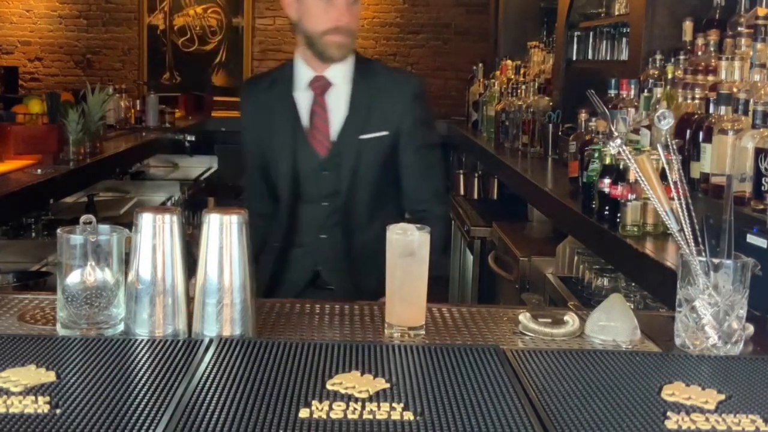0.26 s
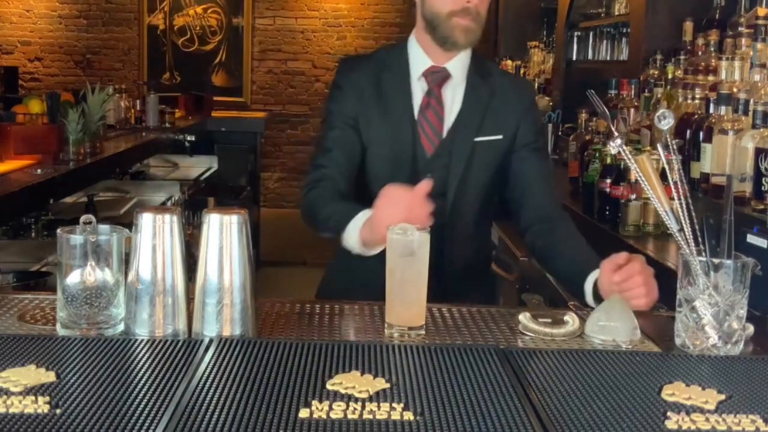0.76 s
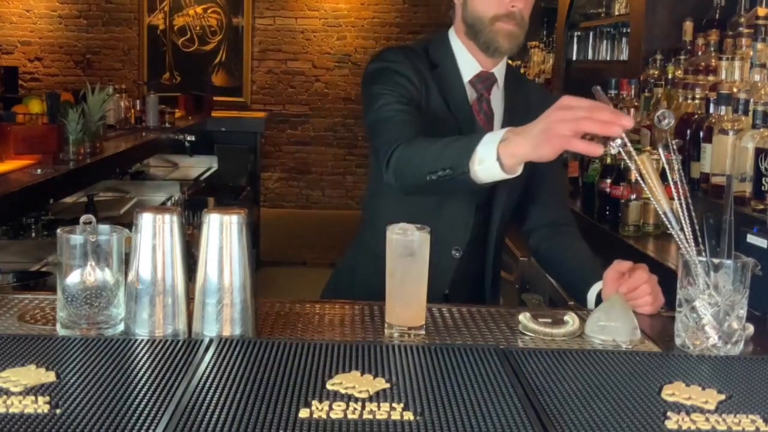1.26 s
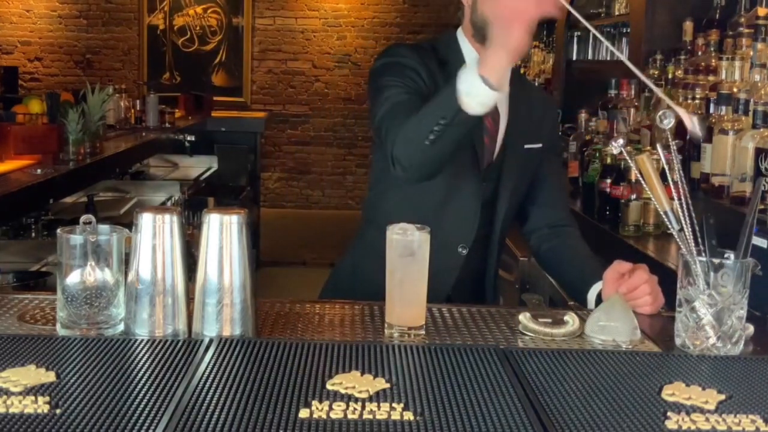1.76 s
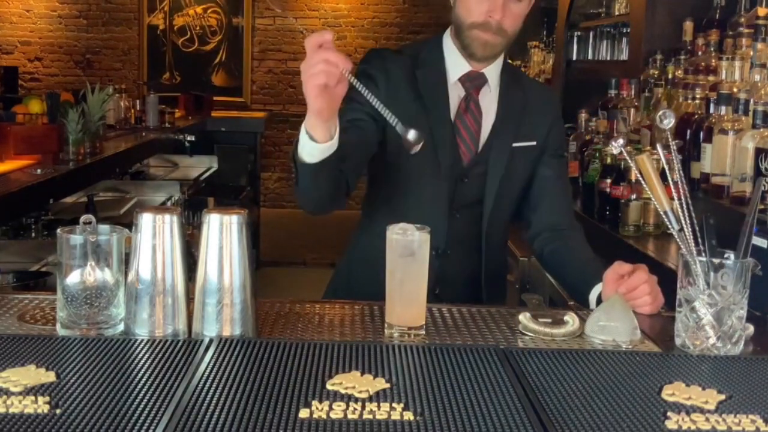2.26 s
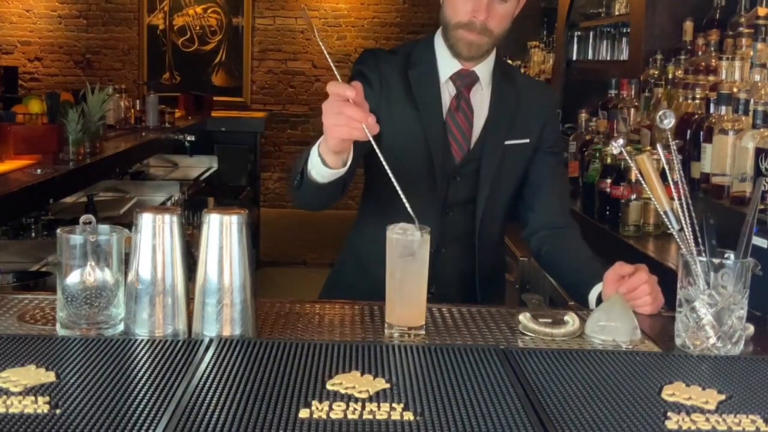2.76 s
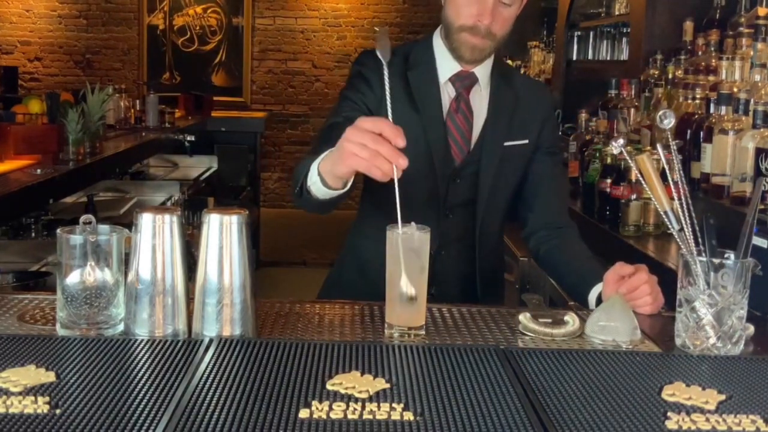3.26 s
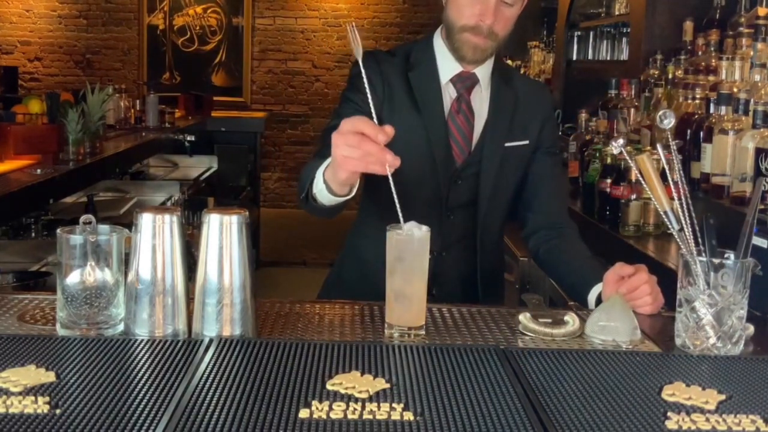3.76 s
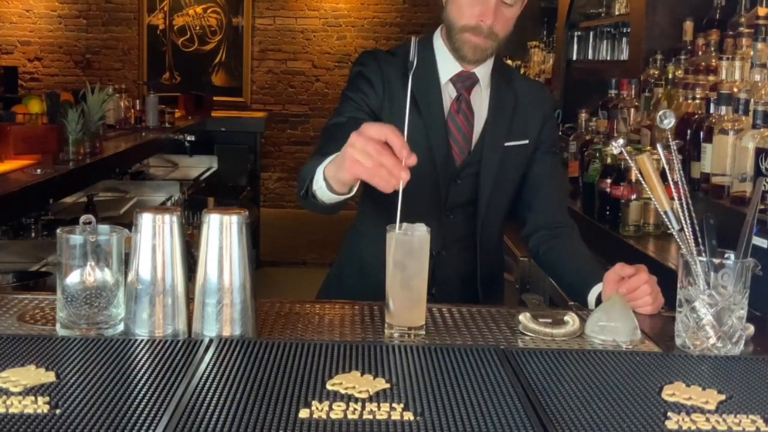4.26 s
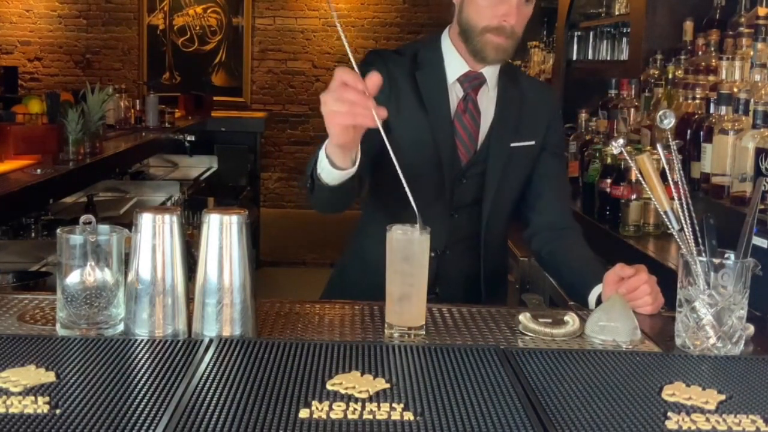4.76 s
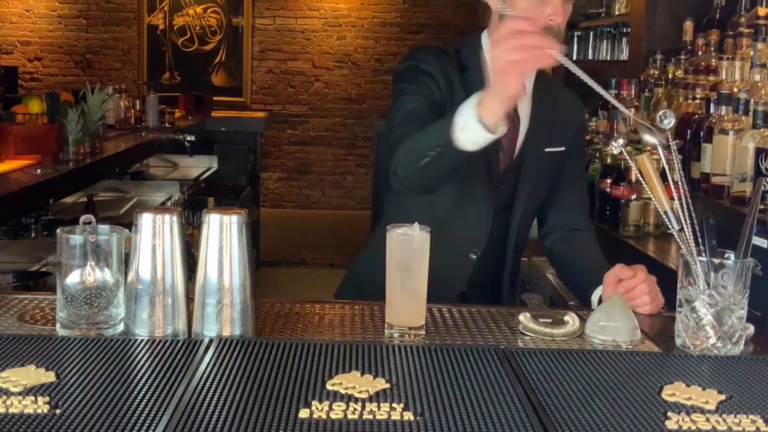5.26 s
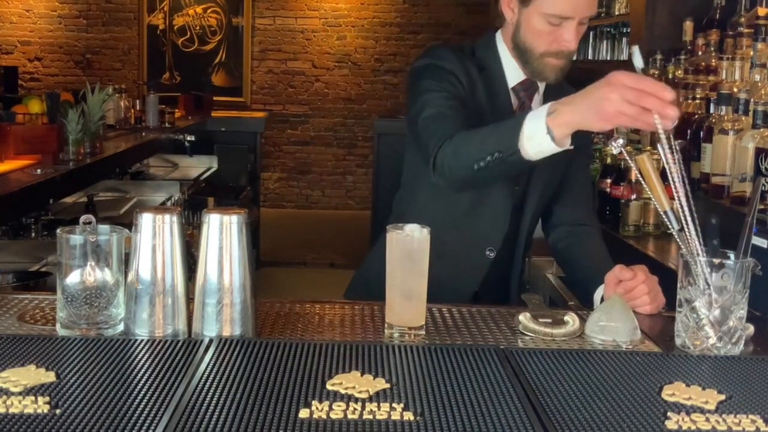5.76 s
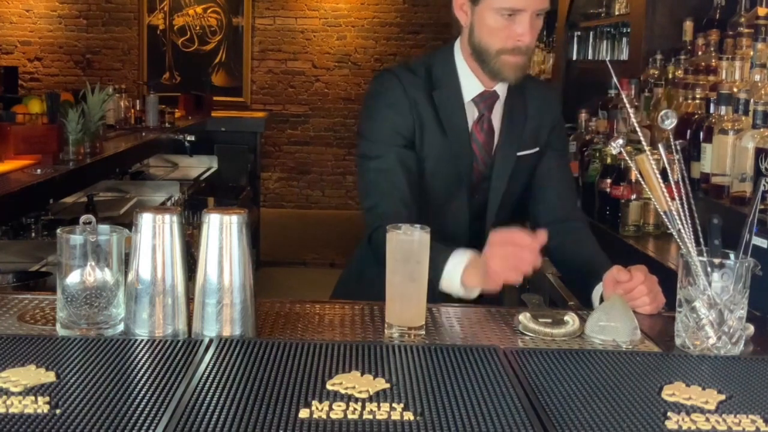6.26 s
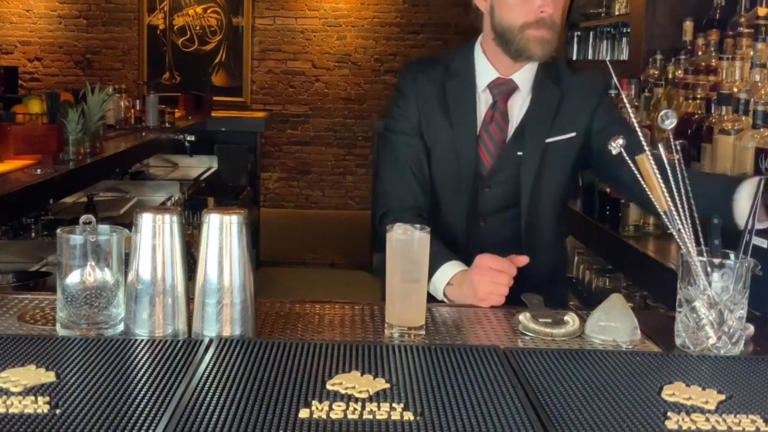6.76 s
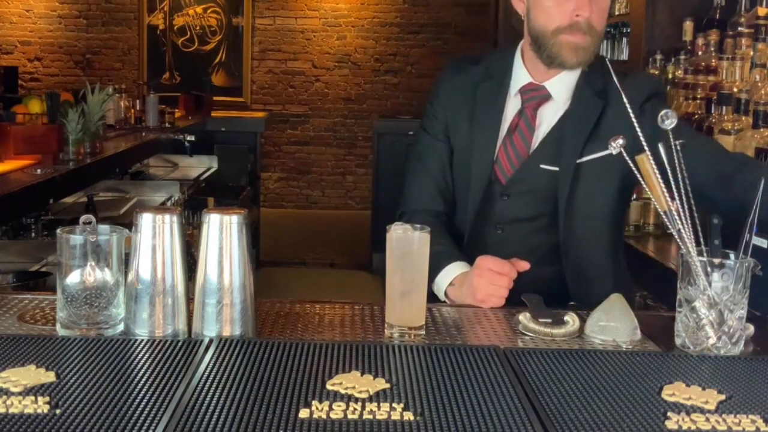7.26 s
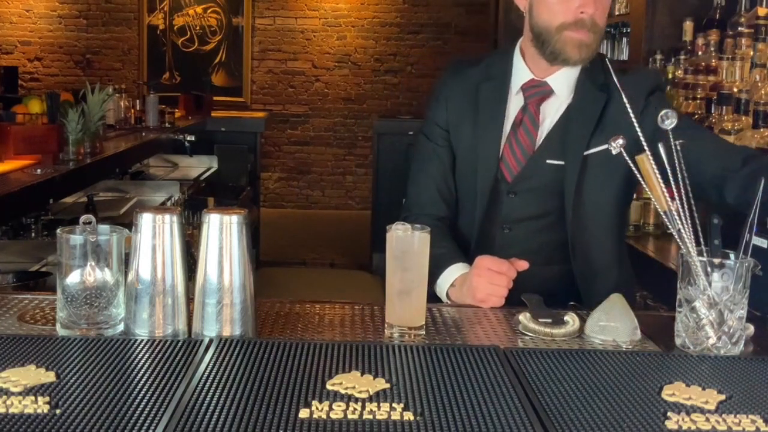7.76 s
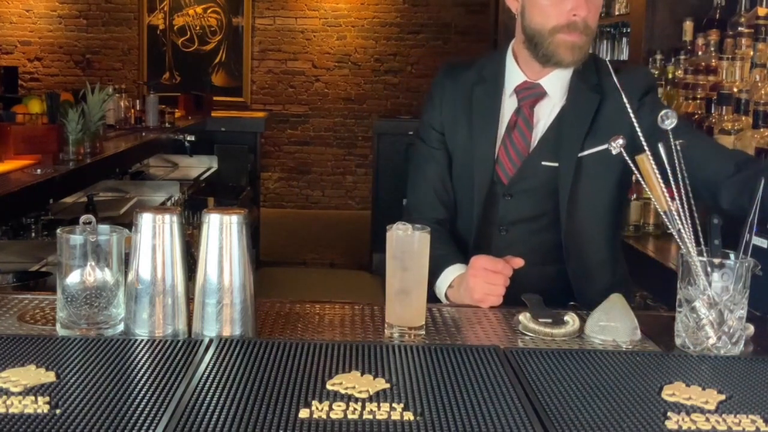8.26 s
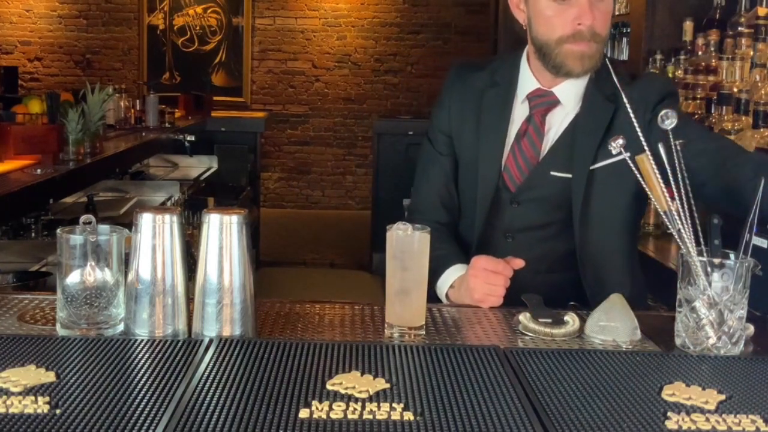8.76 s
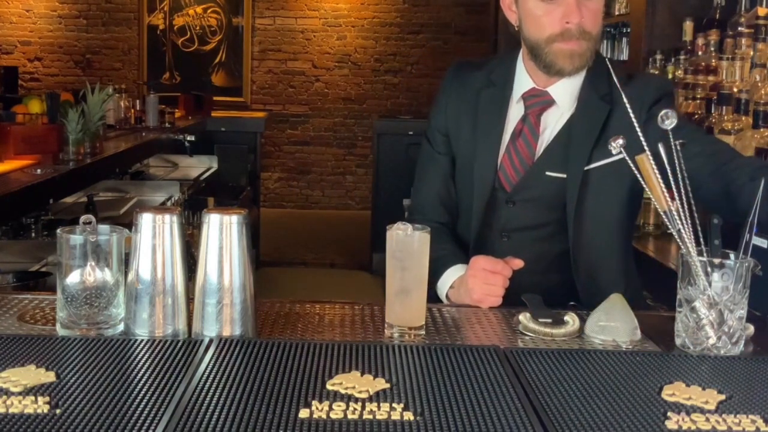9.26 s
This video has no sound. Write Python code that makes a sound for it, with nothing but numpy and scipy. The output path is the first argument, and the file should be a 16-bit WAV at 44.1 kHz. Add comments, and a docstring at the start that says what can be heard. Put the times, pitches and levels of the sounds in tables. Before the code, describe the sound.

A quiet bar with a low wavering engine hum and faint fridge drone. A metal spoon is drawn rattling from among others, taps a tall glass and stirs ice with small dry clicks and fine grinding. It is dropped back with a loud, bright jangle. After soft rubbing, thick bottles knock hard and ring in a steel rack. Close stereo microphones catch a lightly reverberant room.

```python
"""Quiet bar: an engine idles outside, a fridge hums, things shuffle, a sleeve rubs, dull knocks sound.
A bar spoon is drawn from a glass of spoons, stirs ice in a tall drink and is dropped back with a jangle.
Then bottles knock and ring in a steel rack, and a second engine pulls away.
Hits are coloured noise plus decaying modes, movements are swelling noise, engines are wavering sines.
All is heard through a closely spaced pair of microphone ports."""
import sys
import numpy as np
from scipy import signal
from scipy.fft import rfft, irfft, next_fast_len
from scipy.io import wavfile

SR = 44100
rng = np.random.default_rng(int(sys.argv[2]) if len(sys.argv) > 2 else 0)


def bounce(signal):
    """Save signal as a 16-bit WAV file at the path given by the first command-line argument."""
    frames = np.transpose(np.atleast_2d(signal))
    limited = np.clip(frames, -1, 1)
    pcm = np.round(limited * 32767).astype(np.int16)
    wavfile.write(sys.argv[1], SR, pcm)


N = 419832
TIME = np.arange(N) / SR

# likeness of the two ports: f/Hz, left-right correlation
PORT_CORRELATION = [(100,.98),(300,.85),(700,.4),(1300,.75),(2200,.7),(4000,.96),(6500,.84),(8300,.82),(9100,.998),(10400,.998),(11300,.78),(12900,.78),(13700,.995)]


def from_db(db):
    """Decibels to amplitude gain."""
    return 10 ** (np.asarray(db) / 20)


def rms_one(x):
    """Scale to rms 1."""
    return x / np.sqrt(np.mean(x ** 2) + 1e-20)


def in_time(rows):
    """Columns of a time curve, interpolated at each sample."""
    t_s, *columns = np.transpose(rows)
    return [np.interp(TIME, t_s, column) for column in columns]


def at_hz(points, hz):
    """Read a table on a log-frequency axis."""
    f_hz, value = np.transpose(points)
    return np.interp(np.log(hz + 1e-6), np.log(f_hz), value)


def dying(size, t60_s):
    """Exponential decay, -60 dB after t60_s."""
    return np.exp(-np.log(1000) * TIME[:size] / max(t60_s, 1e-3))


def add(out, t_s, sound):
    """Mix a sound in at a time."""
    at = int(t_s * SR)
    out[:, at:at + sound.shape[1]] += sound[:, :N - at]


def drift(rate_hz, size=N):
    """Random values joined by lines, spread about 1."""
    steps = TIME[:size] * rate_hz
    count = int(steps[-1]) + 2
    return np.interp(steps, np.arange(count), rng.standard_normal(count)) * np.sqrt(3 / 2)


def noise(colour_db, size=N):
    """Stereo noise shaped by colour_db(hz); mid and side are mixed to the ports' correlation."""
    padded = next_fast_len(size, True)
    hz = np.fft.rfftfreq(padded, 1 / SR)
    mid, side = rfft(rng.standard_normal((2, padded)))
    alike = np.clip(at_hz(PORT_CORRELATION, hz), 0, 1)
    pair = np.sqrt((1 + alike) / 2) * mid + np.sqrt((1 - alike) / 2) * side * [[1], [-1]]
    return irfft(pair * from_db(colour_db(hz)), padded)[:, :size]


def wash(spectrum):
    """Lasting noise of a given spectrum, rms 1."""
    return rms_one(noise(lambda hz: at_hz(spectrum, hz)))


def bump(hz, centre_hz, share):
    """Resonance of height 1; half-width is a share of its pitch."""
    return 1 / (1 + ((hz - centre_hz) / (share * centre_hz)) ** 2)


def resonant(colour, modes, hz, lift_db, share):
    """Broad colour in dB with a peak at each mode, lower for weak modes."""
    peaks = [bump(hz, mode[0], share) * from_db(min(mode[1], 0) / 4) for mode in modes]
    return at_hz(colour, hz) + lift_db * np.max(peaks, axis=0)


def contact(colour_db, body_db, middle_db, treble_db, t60_s, crack_db, grain_db, size=8192):
    """Hard touch: coloured noise with a brief crack and a tail kept uneven by chatter."""
    tilt = [(1700, body_db), (3200, middle_db), (7500, middle_db), (11500, treble_db)]
    tail = dying(size, t60_s) * from_db(grain_db * drift(500, size=size))
    crack = from_db(crack_db) * dying(size, 0.0022)
    return noise(lambda hz: colour_db(hz) + at_hz(tilt, hz), size=size) * (tail + crack)


def ring(modes, spread_db, flutter, size=44100):
    """One blow: modes of random strength decay and flutter as the loose object rocks."""
    out = np.zeros((2, size))
    for hz, level_db, t60_s in modes:
        apart = np.sqrt(1 - at_hz(PORT_CORRELATION, hz)) / 2
        phase = rng.uniform(0, 2 * np.pi) + apart * rng.standard_normal((2, 1))
        phase = phase + flutter * drift(45, size=size)
        strength = from_db(level_db + spread_db * rng.standard_normal())
        strength = strength * np.exp(flutter / 2 * drift(45, size=size))
        out += strength * dying(size, t60_s) * np.sin(2 * np.pi * hz * TIME[:size] + phase)
    return out


def gestures(rows, rise_s, fall_s):
    """Gain of movements: each swells, holds and dies away exponentially; powers add."""
    power = 0
    for t_s, hold_s, db in rows:
        fade = np.maximum(t_s - TIME, 0) / rise_s + np.maximum(TIME - t_s - hold_s, 0) / fall_s
        power = power + (from_db(db) * np.exp(-np.minimum(fade, 20))) ** 2
    return np.sqrt(power)


def orders(pitch_hz, table, waver_db, wander=.007):
    """Sines at multiples of a wandering pitch, each wavering in level."""
    turn = 2 * np.pi * np.cumsum(pitch_hz * (1 + wander * drift(13))) / SR
    return sum(np.sqrt(2) * from_db(db + waver_db * drift(9)) * np.sin(k * turn) for k, db in table)


def idle_engine():
    """Idling engine through the wall: a tone near the firing rate, with overtones of their own level."""
    # firing rate: t/s, f/Hz
    idle_pitch = [(0.0, 64.0), (0.1, 65), (1.18, 65), (1.54, 77.5), (2.6, 79.5), (2.77, 56), (2.99, 56),
                  (4.16, 62.5), (4.46, 63.0), (4.88, 57.5), (5.02, 78.0), (5.12, 75.5), (5.39, 61),
                  (6.67, 61), (6.91, 58.5), (8.09, 58.5), (8.8, 65.0)]
    # firing tone: t/s, level/dB
    idle_level = [(0.0, -45.5), (0.82, -45), (0.98, -61), (1.14, -48), (2.25, -46.5), (2.33, -54),
                  (2.94, -50.5), (3.71, -37.5), (3.95, -46), (4.48, -39.5), (4.58, -47.5), (5.19, -45),
                  (5.41, -52), (5.49, -43.5), (6.34, -32), (7.13, -41.5), (7.21, -31), (7.85, -31.5),
                  (8.3, -48.5), (8.59, -41.5), (9.47, -47.5), (9.52, -52.5)]
    # all overtones: t/s, level/dB
    idle_overtones = [(0.0, -65), (0.21, -59), (0.48, -73), (5.12, -62.5), (5.62, -54.5), (6.26, -58),
                      (6.81, -43), (7.37, -50.5), (7.64, -43), (9.23, -61.5), (9.52, -55)]
    # overtones: multiple of firing rate, level/dB re the overtone level
    idle_orders = [(2,-0.5),(3,-11.5),(4,-6.5),(5,-17)]
    (firing_hz,), (firing_db,) = in_time(idle_pitch), in_time(idle_level)
    (overtones_db,) = in_time(idle_overtones)
    firing = from_db(firing_db) * orders(firing_hz, [(0.99, 0)], waver_db=1.5)
    return firing + from_db(overtones_db) * orders(firing_hz, idle_orders, waver_db=1.0)


def fridge():
    """Fridge hum: two sines wavering in pitch and level."""
    # tones: f/Hz, level/dB
    fridge_tones = [(199,-64.5),(375,-61)]
    return orders(np.ones(N), fridge_tones, waver_db=2.5)  # multiples of 1 Hz


def room_tone():
    """Room air: broad noise with a slight level drift."""
    # spectrum, shape only: f/Hz, density/dB per Hz
    air_spectrum = [(20,-28),(35,-9),(50,-2),(70,3),(110,-7),(200,-8.5),(350,-12.5),(500,-18.5),(1000,-27),(2000,-33),(4000,-45.5),(8000,-54.5),(16000,-56.5)]
    return from_db(-48.5 + 0.27 * drift(4)) * wash(air_spectrum)


def shuffling():
    """Movements behind the bar: dull noise in swells."""
    # movements: hold start t/s, hold/s, level/dB
    shuffles = [(.11,0.037,-52),(.87,0.045,-56.5),(1.18,0.042,-45),(1.44,0.15,-51.5),(2.51,0.044,-49),(3.26,0.057,-49.5),(4.75,0.034,-46.5),(5.31,0.13,-57.5),(5.95,0.16,-48),(6.8,0.018,-49.5),(7.36,0.047,-61),(9.19,0.0093,-71)]
    # spectrum: f/Hz, relative level/dB
    shuffle_colour = [(100,-14),(400,4.5),(900,3),(1500,-2),(2500,-6),(5000,-18),(8000,-20.5),(12000,-33),(16000,-42)]
    gain = gestures(shuffles, rise_s=.035, fall_s=.1)
    return gain * from_db(1.5 * drift(70)) * wash(shuffle_colour)


def sleeve():
    """Sleeve rubbing while an arm reaches: uneven noise in swells."""
    # reaches: hold start t/s, hold/s, level/dB
    reaches = [(.53,0.48,-67.5),(5.47,.1,-75),(6.22,0.26,-67),(6.55,0.7,-66),(6.69,.01,-55.5)]
    # spectrum: f/Hz, relative level/dB
    sleeve_colour = [(300,-11),(2000,0),(5000,-2),(8000,2),(11000,2),(14000,-8),(16000,-8.5)]
    gain = gestures(reaches, rise_s=0.062, fall_s=0.082)
    return gain * from_db(1.5 * drift(76)) * wash(sleeve_colour)


def soft_knocks():
    """Soft knocks and plops: noise in one broad resonance, quick onset, short decay."""
    # knocks: t/s, level/dB, f/Hz
    knock_rows = [(1.108,-35,549),(1.169,-42,482),(3.229,-43.5,617),(3.871,-40.5,511),(4.682,-30.5,470),(4.745,-36,1150),(5.314,-39.5,420),(6.677,-42,441),(7.384,-43,600),(9.173,-46.5,1087),(9.197,-52,1640)]
    out = np.zeros((2, N))
    envelope = (1 - np.exp(-TIME[:8192] / 0.0025)) * dying(8192, t60_s=.1)
    for t_s, db, pitch_hz in knock_rows:
        thud = noise(lambda hz: 18 * np.log10(bump(hz, pitch_hz, 0.42)), size=8192)
        add(out, t_s, from_db(db) * rms_one(thud) * envelope)
    return out


def spoons():
    """Steel bowls jangle in their glass, long shafts sing on more softly; a landing knocks the glass."""
    # clashes: t/s, level/dB, body tilt/dB, treble tilt/dB
    spoon_hits = [(1.182,-41,-3,-27),(1.2,-31.5,-1.5,-23),(1.2366,-32.5,-12,-30),(1.394,-30,-10,-17),(1.418,-29,-5,-10),(1.439,-21,-13.5,-13),(1.5646,-22.5,-11,-11.5),(5.5212,-9.5,-21.5,-15),(5.5708,-10,-21,-16),(5.611,-12.5,-14,-23),(5.6197,-14.5,-11,-27),(5.65,-18.5,-16,-11),(5.9072,-22.5,-8,-15.5),(5.9354,-20.5,-15,-13.5),(5.995,-24,-9,-30),(6.0475,-30,-17,-28)]
    # shafts set swinging: t/s, level/dB
    shaft_hits = [(1.195,-51),(1.2376,-50.5),(1.4404,-57),(5.6184,-57),(5.9938,-47),(6.0475,-50.5)]
    # bowl modes: f/Hz, level/dB, t60/s
    spoon_modes = [(3750,-16,0.18),(4900,-9,.1),(5590,-3,0.15),(5720,-9,0.16),(5810,-7,0.22),(6500,-18,0.19),(8710,-8,0.17),(11120,-2,0.26),(12700,-5,0.13),(13506,-5,0.16),(14630,-7.5,.1)]
    # shaft modes: f/Hz, level/dB, t60/s
    shaft_modes = [(1405,1,0.6),(2100,-1,.33),(2535,5,.45),(2680,3,0.7),(3595,-4,0.4),(4230,-10,0.35),(4610,-10,0.55),(5790,-7.5,.4),(6508,-11.5,.5),(7390,-13,.45)]
    # glass holding the spoons: f/Hz, level/dB, t60/s
    holder_modes = [(2130,3,0.039),(2280,1,.08)]
    # contact colour: f/Hz, relative level/dB
    spoon_colour = [(100,-27),(350,1.5),(1000,5.5),(1600,-4),(3200,-2),(4500,-4),(5700,5),(7500,-0.5),(10000,6),(13000,2.5),(15300,-2),(16500,-25.5)]
    # the twisted shaft rattles past its neighbours as it is drawn out
    draw_start_s, draw_end_s, rattles_per_s = 1.513, 1.61, 24
    rattle_db, rattle_body_db, rattle_treble_db = -25, -19.5, -7
    # soft clashes slide into contact, hard ones snap
    slide_s, hard_db, soft_db = 0.0035, -16.5, -30
    landing_s, landing_db = 5.5212, -23
    out = np.zeros((2, N))
    all_modes = list(spoon_modes) + list(shaft_modes)

    def colour_db(hz):
        return resonant(spoon_colour, all_modes, hz, lift_db=7, share=0.012)

    rattle = []
    for beat_s in np.arange(draw_start_s, draw_end_s, 1 / rattles_per_s):
        t_s, db = beat_s + 0.0018 * rng.normal(), rattle_db + 1.3 * rng.normal()
        rattle.append((t_s, db, rattle_body_db, rattle_treble_db))
    for t_s, db, body_db, treble_db in list(spoon_hits) + rattle:
        touch = contact(colour_db, body_db, -10.5, treble_db, t60_s=0.19,
                        crack_db=-10.5, grain_db=2.5, size=12000)
        touch = touch + from_db(-20.5) * ring(spoon_modes, spread_db=-1.0, flutter=0.89, size=12000)
        attack_s = np.interp(db, [soft_db, hard_db], [slide_s, 1 / SR])
        add(out, t_s, from_db(db) * touch * (1 - np.exp(-TIME[:touch.shape[1]] / attack_s)))
    landing = ring(holder_modes, spread_db=1, flutter=.5, size=8192)
    add(out, landing_s, from_db(landing_db) * landing)
    for t_s, db in shaft_hits:
        add(out, t_s, from_db(db) * ring(shaft_modes, spread_db=1.5, flutter=1.0, size=30000))
    return out


def ice_touch(pitch_hz, body_db, treble_db, t60_s):
    """Touch inside the filled glass: glass resonances plus a peak at its own pitch."""
    # filled drinking glass: f/Hz, level/dB
    glass_modes = [(1570,0),(3290,-9),(4180,-13),(5080,-5.5),(7400,-23)]
    # contact colour: f/Hz, relative level/dB
    ice_colour = [(150,-16),(700,-3.5),(1500,6.5),(2400,6),(3300,6.5),(5000,7),(7000,2),(10000,12.5),(13000,5),(16000,0)]

    def colour_db(hz):
        glass_db = resonant(ice_colour, glass_modes, hz, lift_db=4, share=0.033)
        return glass_db + 8 * bump(hz, pitch_hz, 0.11)

    return contact(colour_db, body_db, -13.0, treble_db, t60_s, crack_db=-7.5, grain_db=0.5)


def ice_hits():
    """Spoon taps the glass wall, bright and ringing; cubes snap on the spoon, short and dry."""
    # spoon on glass wall: t/s, level/dB
    glass_taps = [(2.7375,-36),(2.7645,-33.5),(2.7776,-34),(3.4457,-32),(4.3318,-26),(4.3424,-42)]
    # cube on spoon: t/s, level/dB, treble tilt/dB, f/Hz
    cube_clicks = [(2.9468,-29.5,-17.5,3100),(3.0273,-34.5,-21,5030),(3.121,-33.5,-22,3340),(3.1945,-31,-27,4560),(3.5318,-35,-29,3220),(3.6329,-35,-18,3250),(3.8108,-29,-28,4640),(3.9288,-36.5,-44,4450),(3.9579,-24,-22.5,4180),(4.204,-37,-22,5070),(4.229,-36,-15,3510),(4.244,-31.5,-24,4990),(4.6445,-35,-32,3460),(4.82,-41.5,-41,4430),(5.0757,-48,-30,3300)]
    out = np.zeros((2, N))
    for t_s, db in glass_taps:
        tap = ice_touch(pitch_hz=7070, body_db=-9, treble_db=-14, t60_s=0.11)
        add(out, t_s, from_db(db) * tap)
    for t_s, db, treble_db, cube_hz in cube_clicks:
        click = ice_touch(cube_hz, body_db=-20.5, treble_db=treble_db, t60_s=0.053)
        add(out, t_s, from_db(db) * click)
    return out


def ice_churn():
    """Each push of the spoon churns the ice: fine grinding noise under a crowd of small pitched ticks."""
    # pushes: hold start t/s, hold/s, level/dB
    pushes = [(3.09,0.022,-52),(3.277,0.055,-60),(3.55,0.096,-58.5),(3.794,0.13,-56.5),(4.05,.04,-66.5),(4.258,0.13,-57.5),(4.757,0.024,-59)]
    # grinding spectrum: f/Hz, relative level/dB
    grind_colour = [(300,-29),(900,-4),(1500,6),(2400,1),(3400,-6),(4400,-3),(6300,-3.5),(8500,-13.5),(12000,-23),(16000,-33)]
    rise_s, fall_s, ticks_per_s = 0.067, 0.1, 85
    tick_db, tick_spread_db = 2, 16  # re the push gain
    out = np.zeros((2, N))
    churn = gestures(pushes, rise_s, fall_s)
    grinding = churn * from_db(-6.0 + 4.8 * drift(160)) * wash(grind_colour)
    beats_s = np.arange(pushes[0][0] - 2 * rise_s, pushes[-1][0] + 2 * fall_s, 1 / ticks_per_s)
    for beat_s, (late, pitch, force) in zip(beats_s, rng.random((len(beats_s), 3))):
        t_s = beat_s + 2 * late / ticks_per_s
        cube_hz = 3200 * 1.7 ** (pitch ** 3)
        tick = noise(lambda hz: at_hz(grind_colour, hz) + 16 * bump(hz, cube_hz, .06), size=2048)
        gain = churn[int(t_s * SR)] * from_db(tick_db + tick_spread_db * force ** 2.1)
        add(out, t_s, gain * rms_one(tick) * dying(2048, 0.032))
    return out + grinding


def bottles():
    """Thick glass knocks and chatters in a steel rack; returns noisy knocks and modal ringing."""
    # knocks: t/s, level/dB, body tilt/dB, treble tilt/dB, t60/s
    bottle_hits = [(7.4414,-20.5,-5.5,-31,0.056),(7.47,-6.5,-15,-35,0.063),(8.050,-10.5,-7.5,-28,0.16),(8.0623,-7,-8,-17.5,0.11),(8.077,-11.5,-7,-25,.06),(8.2185,4,-12.5,-31.5,0.049),(8.2264,0.5,-25,-15.5,.07),(8.238,-4,-9.5,-24.5,0.048)]
    # blows: t/s, first bottle level/dB, second bottle level/dB, rack level/dB
    bottle_rings = [(7.4416,-45.5,-63,-89.5),(7.4689,-25,-50.5,-63.5),(8.0497,-34.5,-25,-59.5),(8.076,-38,-32,-51),(8.2188,-30,-22,-27.5)]
    # modes: f/Hz, level/dB, t60/s, body (0 first bottle, 1 second bottle, 2 rack)
    bottle_modes = [(1863,-3,0.4,0),(3168,-12,0.9,0),(3177,-13,0.65,0),(3486,-8,0.33,0),(5814,4,0.32,0),(6487,-4.5,0.27,0),(7100,-13,0.33,0),(7983,-11,0.24,0),(10715,-1.5,.18,0),(12100,-13,.2,0),(13160,-18,.22,0),(15560,-19,0.15,0),
                    (3030,-10,.16,1),(3268,-14,.45,1),(3490,-13,.55,1),(3560,-16,.5,1),(4490,-17.5,.45,1),(5748,-3,0.33,1),(6264,4.5,0.24,1),(6400,-8,.33,1),(6990,-12,.35,1),(12050,-10.5,.23,1),(15100,-23,.1,1),
                    (1018,0,.16,2),(1198,-9.5,.6,2),(1281,-1,0.27,2),(1868,-10,.7,2)]
    # contact colour: f/Hz, relative level/dB
    bottle_colour = [(100,-3.5),(260,-3.5),(360,8.5),(480,1.5),(700,1),(1250,-0.5),(1850,5),(2500,-4),(3300,3),(4800,-6.5),(6200,4.5),(7800,-5.5),(9000,-34),(12300,4.5),(13300,1),(14100,-17.5),(15300,-11),(16300,-19)]
    knocks, ringing = np.zeros((2, 2, N))

    def colour_db(hz):
        return resonant(bottle_colour, bottle_modes, hz, lift_db=12, share=0.01)

    for t_s, db, body_db, treble_db, t60_s in bottle_hits:
        knock = contact(colour_db, body_db, -12, treble_db, t60_s, crack_db=-17.0, grain_db=-1.5)
        add(knocks, t_s, from_db(db) * knock)
    for t_s, *strengths_db in bottle_rings:
        for body, (db, flutter) in enumerate(zip(strengths_db, (.4, .7, .8))):
            own_modes = [mode[:3] for mode in bottle_modes if round(mode[3]) == body]
            add(ringing, t_s, from_db(db) * ring(own_modes, spread_db=3.0, flutter=flutter))
    return knocks, ringing


def second_engine():
    """Second engine pulls away: uneven multiples of a rising firing rate."""
    # course: t/s, firing f/Hz, level/dB
    pull_away = [(8.3,61.86,-84),(8.6,62.5,-55.5),(8.8,69.3,-51),(8.95,92.9,-44.5),(9.1,96.3,-45),(9.3,98,-46.5),(9.52,100.4,-48)]
    # tones: multiple of firing rate, relative level/dB
    pull_orders = [(.84,-3.5),(1.7,-6.5),(2,2),(3,-7.5)]
    firing_hz, level_db = in_time(pull_away)
    return from_db(level_db) * orders(firing_hz, pull_orders, waver_db=1.8, wander=.03)


def room(x, wet_db, size=40000):
    """Diffuse reflections: noise bands, each with its own decay, convolved with the mono sum."""
    # reverberation: f/Hz, t60/s
    room_t60 = [(150,0.93),(700,0.79),(2500,0.86),(5500,0.67),(8000,0.36),(12000,1),(16000,0.23)]
    edges_hz = np.geomspace(100, 18000, 12)
    hz, tail = np.fft.rfftfreq(size, 1 / SR), 0
    white = rfft(noise(np.zeros_like, size=size))
    for low, high in zip(edges_hz, edges_hz[1:]):
        band = irfft(white * ((hz >= low) & (hz < high)), size)
        tail = tail + band * dying(size, at_hz(room_t60, np.sqrt(low * high)))
    tail = tail * (1 - np.exp(-TIME[:size] / 0.0043))  # soft onset
    tail = from_db(wet_db) * rms_one(tail) / np.sqrt(size)
    return signal.fftconvolve(x.mean(axis=0)[None], tail, axes=1)[:, :N]


def scene():
    """All sources; the close ones each send a share to the room."""
    hum = idle_engine() + fridge() + second_engine()
    hands = shuffling() + sleeve() + soft_knocks()
    steel, drink = spoons(), ice_hits() + ice_churn()
    knocks, ringing = bottles()
    sent = from_db(-1.0) * hands + from_db(-5.0) * steel + from_db(-1) * drink
    sent += from_db(-6) * knocks + from_db(-10.0) * ringing
    return hands + steel + drink + knocks + ringing + room(sent, wet_db=-7) + room_tone() + hum


def record(dry):
    """Two ports turn the phase between channels; peaks are rounded and the top is cut."""
    # port phase: f/Hz, left lead/rad
    port_phase = [(0,0),(600,.2),(1300,0),(2000,-1.6),(2500,-3.15),(3000,-4.9),(3750,-6.25),(6500,-7.35),(8000,-8.4),(9100,-9.4),(10400,-9.45),(12500,-11.2),(13700,-12.55),(17000,-12.57)]
    cutoff_hz, ceiling = 16000, .82
    padded = next_fast_len(N + 4096, True)
    hz = np.fft.rfftfreq(padded, 1 / SR)
    turn = np.interp(hz, *np.transpose(port_phase)) * np.array([[.5], [-.5]])
    heard = irfft(rfft(dry, padded) * np.exp(1j * turn), padded)
    rounded = heard / (1 + (heard / ceiling) ** 6) ** (1 / 6)
    low_pass = 1 / np.sqrt(1 + (hz / cutoff_hz) ** 120)
    return irfft(rfft(rounded) * low_pass, padded)[:, :N]


dry = scene()
out = record(dry)
bounce(out)
```